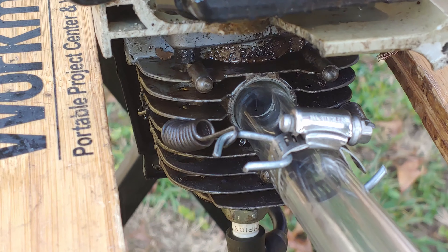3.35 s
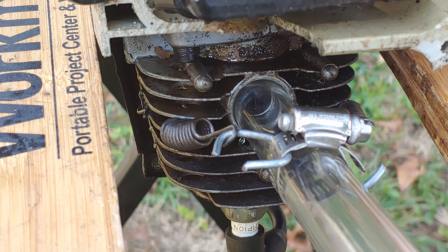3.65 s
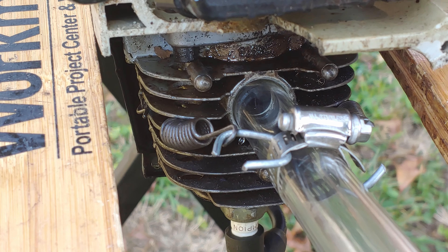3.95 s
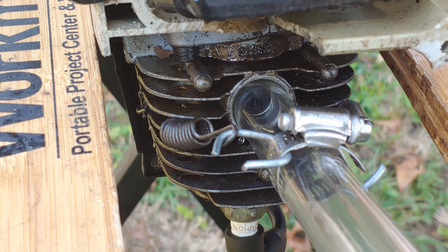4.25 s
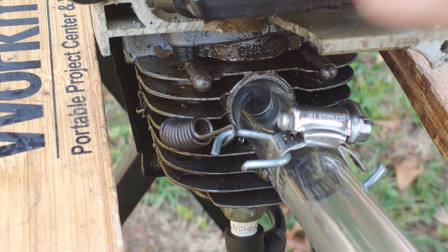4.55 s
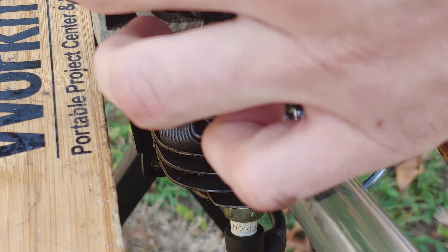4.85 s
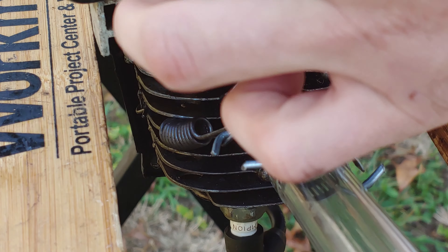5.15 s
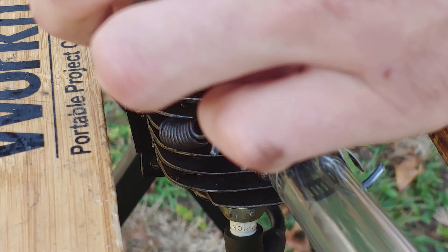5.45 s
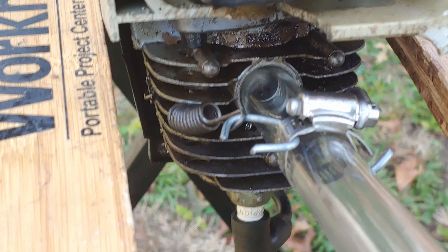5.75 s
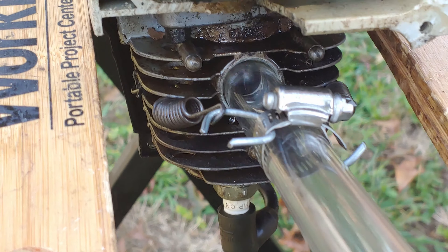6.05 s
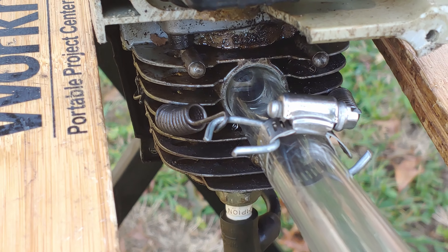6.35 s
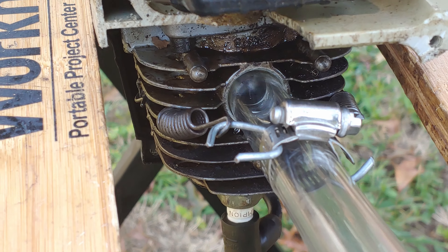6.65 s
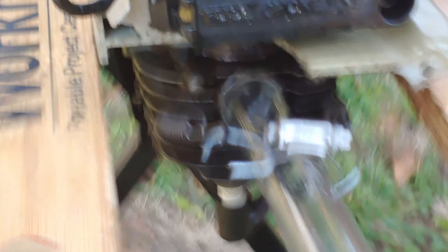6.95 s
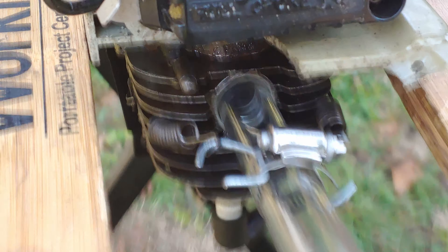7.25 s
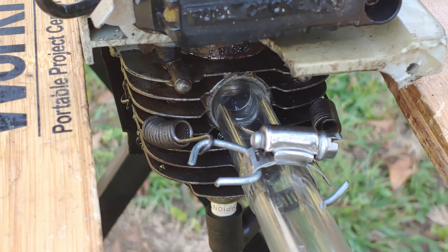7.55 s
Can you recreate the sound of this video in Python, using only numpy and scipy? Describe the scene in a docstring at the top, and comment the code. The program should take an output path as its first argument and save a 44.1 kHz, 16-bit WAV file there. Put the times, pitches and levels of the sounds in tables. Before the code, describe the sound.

A low garden hum and faint crickets run throughout. Close by, a few soft workbench thuds lead to a sharp plastic handle knock at 0.4 seconds. At 1.6 and 2.5 seconds a small two-stroke engine is pulled over. Each time the starter snaps in with a metallic clink, the cord zips taut, the engine gives a quick run of hollow puffs that slows without firing, and the cord rubs back in over a clicking ratchet. The handle knocks around 3.1 seconds. A pause follows with faint scuffs, tiny squeaks and one faint bird chip at 4.5 seconds. More knocks come around 5.3 seconds, then two further pulls at 5.7 and 6.7 seconds, each with the same puffing and ratcheting rewind. The engine never catches. From 7.3 to 7.8 seconds the bench thuds and the handle knocks against the housing.

```python
"""Over a garden hum and crickets come a few thuds and handle knocks, then a small two-stroke engine,
clamped to a workbench, is pulled over four times and never catches. On each pull the starter pawls snap
into their steel cup and the cord zips taut; every crank turn puffs out of the cylinder and rings the
closed pipe; then the cord rubs back in over the clicking ratchet. Faint scuffs and squeaks dot the
pauses, and one bird chips in the longest."""
import sys
import numpy as np
from scipy import signal
from scipy.fft import rfft, irfft
from scipy.io import wavfile
from scipy.ndimage import uniform_filter1d, minimum_filter1d, map_coordinates

SR = 44100
rng = np.random.default_rng(int(sys.argv[2]) if len(sys.argv) > 2 else 0)


def generate_wav(sig):
    """Save sig (samples, or channels by samples) to the path in sys.argv[1] as 16-bit PCM at SR."""
    pcm = np.round(np.clip(np.atleast_2d(sig).T, -1, 1) * 32767).astype(np.int16)
    wavfile.write(sys.argv[1], SR, pcm)


N = 343772
TIME = np.arange(N) / SR
AGE = TIME[:SR // 3]  # seconds since the start of a one-shot

# Tone of the garden air, cord rub, housing cracks, gas hiss and ratchet clicks.
# Each row: frequency in Hz, relative gain in dB.
AIR_EQ = [(25, -15), (42, -0.5), (110, 2.5), (150, -6.5), (220, -13.5), (450, -18.5), (800, -23),
          (1500, -27.5), (2400, -35), (4700, -32), (5400, -41), (9500, -39.5), (12000, -56), (14000, -71)]
RUB_EQ = [(200, 0), (500, -1), (1050, 1.5), (1500, 1), (1750, -6.5), (2050, -4.5), (2700, -22.5),
          (4400, -15.5), (5400, -22), (6600, -27.5), (11500, -23), (14000, -73)]
CRACK_EQ = [(300, -25), (800, 12.5), (2000, 5), (3300, 9), (5500, 2), (7000, 2.5), (11500, -7),
            (13500, -46), (16000, -26)]
GAS_EQ = [(300, 10), (1200, 0), (2300, 5.5), (2900, 1), (4400, -4.5), (5500, -15.5), (6600, 1.5),
          (8000, -34), (11500, -14.5), (13500, -19)]
CLICK_EQ = [(400, -20.5), (1100, 14.5), (2400, -1), (3500, 2), (4400, 11), (5300, -2), (6500, 2),
            (8600, -8), (11300, -4.5), (13000, -22.5), (15500, -29)]
# Resonances. Each row: nominal pitch in Hz, nominal time to fade 60 dB in seconds, relative level in dB.
BENCH_MODES = [(112, 0.15, -7.5), (188.4, 0.16, -6), (322, 0.059, -2), (441, 0.07, -1), (513, 0.036, 1)]  # bench top and frame
HOUSING_MODES = [(567, 0.11, -13.5), (816, 0.12, -12), (975, 0.039, 6.5), (1128, 0.031, 8),
                 (1301, 0.028, 12), (1509, 0.028, 10.5), (1850, 0.028, 4), (3160, 0.06, -14.5)]  # plastic starter housing and handle
CUP_MODES = [(3300, .15, -10), (3645, .09, -6), (4115, .35, 0), (4270, .1, -4), (4345, .28, 0),
             (4525, .28, -3), (4860, .28, -6), (6580, .06, -4), (7740, .14, -8), (9770, .08, -10),
             (10470, .14, -12), (10990, .12, -9), (11600, .1, -12)]  # steel starter cup and flywheel
OPEN_PORT_MODES = [(182, 0.021, -2), (265.4, 0.019, 1.5), (379, 0.021, -3.5), (597, 0.023, -3),
                   (1045, 0.035, -17), (1377, 0.064, -37)]  # cylinder and pipe with the port open
SHUT_PIPE_MODES = [(262, 0.053, 5.5), (801, 0.052, -0.5), (1290, 0.085, -11.5), (1840, 0.055, -12.5),
                   (2370, 0.15, -25), (2880, 0.087, -30)]  # a quarter-wave tube with odd overtones
# A distant motor's hum. Each row: pitch in Hz, level in dB before the swell.
HUM_PARTIALS = [(57.5, -80), (120, -49.5), (178, -59.5), (239, -65)]
# The slow swell of the garden bed. Each row: time in seconds, boost in dB.
GARDEN_SWELL = [(0, 8), (.6, 1.5), (1.3, 4), (3.3, 0), (3.7, 4), (4.5, 4.5), (5.1, 4.5), (6.5, 1), (7.8, 7)]
# Bench thuds. Each row: start in seconds, level in dB.
THUDS = [(.005, -28), (0.254, -22.5), (0.279, -26), (.341, -21.5), (1.522, -26.5), (2.966, -24),
         (5.492, -22.5), (6.152, -24), (6.204, -25), (7.297, -8.5), (7.433, -15), (7.644, -27.5),
         (7.741, -18)]
# Faint scuffs and rustles. Each row: start in seconds, length in seconds, level in dB.
SCUFFS = [(0.058, 0.063, -48), (1.187, 0.083, -53.5), (3.33, 0.022, -46.5), (3.482, 0.054, -51.5),
          (3.604, 0.058, -45), (3.87, 0.28, -57), (4.654, 0.058, -51.5), (5.478, 0.063, -39.5)]
# Far squeaks. Each row: start in seconds, length in seconds, centre pitch in Hz, level in dB.
SQUEAKS = [(0.063, 0.064, 1624, -47), (4.663, .05, 1680, -59), (4.858, 0.029, 1647, -51.5)]
# The handle hits the housing. Each row: start in seconds, body in dB, crack in dB,
# tilt of the body in dB per octave.
HANDLE_KNOCKS = [(.248, -26, -32.5, -8), (.280, -37, -38, -6), (.3665, -2.5, -2.5, -2),
                 (.982, -34, -46, -32), (2.256, -13.5, -45, 4), (3.085, -9.5, -18, 5),
                 (3.15, -10.5, -18, 11), (3.1851, -7.5, -50, 3), (3.636, -38, -42, -4),
                 (3.736, -36.5, -41, -19), (3.846, -50, -39, 0), (5.194, -17, -35, -6),
                 (5.324, -15, -18.5, -8), (5.337, -15, -9, -8), (5.492, -24, -37, 16.5),
                 (5.686, -28.5, -44, 2), (7.4026, -5, -23, 3), (7.536, -22.5, -42, 6.5),
                 (7.587, -27, -58, -1), (7.619, -22.5, -55, -21.5), (7.661, -28, -19.5, 0)]
# The four pulls. Each row: pawl catch in seconds, its level in dB, its tilt in dB per octave,
# cup ring in dB, cord rub in dB, puffs in dB, first puff against the rest in dB.
PULLS = [(1.586, -11, 1, -23, -27, 0.5, -1), (2.457, 0, -5.5, -4.5, -22, -1, -6.5),
         (5.724, 0, -9, 1, -24, 0, -10.5), (6.662, 0.5, 3, -9, -23, -1.5, 0.5)]
# The cord snaps taut against the first full compression.
# Each row: time in seconds, zip in dB, jolt of the housing in dB.
TUGS = [(1.645, -17, -3), (2.491, -17, -1), (5.785, -20, -8), (6.716, -11, -14)]
# Crank speed, one curve a pull: it dips on compression, rises with the arm and coasts down.
# Each row of a curve: time in seconds, speed in turns per second.
CRANK_SPEEDS = [
    [(1.6499, 15.54), (1.6976, 29.8), (1.7846, 37.35), (1.9008, 13.41), (1.9992, 10.5)],
    [(2.4866, 46.72), (2.5121, 34.35), (2.6076, 47.14), (2.7717, 14.59), (2.8606, 11.38)],
    [(5.7528, 31.38), (5.7874, 28.04), (5.9053, 42.63), (6.0229, 20.07), (6.1109, 7.81)],
    [(6.7161, 24.4), (6.7521, 36.78), (6.8352, 48.86), (6.9807, 19.2), (7.0872, 9.08)],
]
# Near full speed a pawl skips on the cup. Each row: start in seconds, level in dB.
PAWL_SKIPS = [(1.738, -20.5), (1.823, -20.5), (2.622, -12.5), (5.887, -15.5), (6.84, -9)]
# Pulley speed as the hand lets the cord back in, one curve a pull.
# Each row of a curve: time in seconds, speed in ratchet teeth per second.
REWIND_SPEEDS = [
    [(1.917, 80), (2.0122, 58.59), (2.1033, 54.6), (2.1963, 76), (2.232, 13.73)],
    [(2.8208, 76), (2.8477, 40.5), (2.975, 61.5), (3.0696, 47.4), (3.1584, 7.46)],
    [(6.0942, 16.5), (6.1555, 53), (6.2265, 108.6), (6.2282, 81.49), (6.362, 54.4)],
    [(7.051, 74), (7.1242, 42.7), (7.186, 102.4), (7.2059, 48.8), (7.3855, 27.2)],
]

WEAK_SPEED, RINGING_SPEED = 20, 27.6  # turns per second: puffs weaken below; the pipe rings best
USUAL_REWIND = 60  # teeth per second at which the rewind has its nominal level


def undb(db):
    """Decibels to gain."""
    return 10 ** (np.asarray(db) / 20)


def unit(x):
    """Scale to rms 1."""
    return x / np.sqrt(np.mean(x ** 2))


def add(out, s, sound):
    """Mix a sound into out from time s on."""
    i = max(int(s * SR), 0)
    out[..., i:i + sound.shape[-1]] += sound[..., :N - i]


def eq(x, points, size=4096):
    """Minimum-phase filter through (Hz, dB) points, scaled to unit power gain."""
    hz, db = np.transpose(points)
    grid = np.maximum(np.arange(size // 2 + 1) * SR / size, 1)
    gain = undb(np.interp(np.log(grid), np.log(hz), db))
    cepstrum = irfft(np.log(gain))
    cepstrum[1:size // 2] *= 2
    cepstrum[size // 2 + 1:] = 0
    response = irfft(np.exp(rfft(cepstrum)))
    return signal.oaconvolve(x, response[None] / np.linalg.norm(response))[:, :x.shape[1]]


def ring(hz, t60, db, phase=0):
    """One struck mode."""
    return undb(db) * np.sin(2 * np.pi * hz * AGE + phase) * np.exp(-np.log(1000) * AGE / t60)


def stereo_noise(size, shared):
    """White noise with the given share of its power common to left and right."""
    noise = rng.standard_normal((3, size))
    return np.sqrt(shared) * noise[2] + np.sqrt(1 - shared) * noise[:2]


def drift(rate):
    """Random wandering near a spread of 1: rate knots a second, holding after the last."""
    knots = rng.standard_normal(2048)
    return np.interp(TIME * rate, np.arange(len(knots)), knots)


def pan(db):
    """Left and right gains for a left minus right level."""
    return undb(np.array([[db], [-db]]) / 2)


def soften(sound, push_s):
    """A push spread over time excites only the lower modes."""
    push = AGE[:SR // 40] * np.exp(-AGE[:SR // 40] / push_s)
    return signal.fftconvolve(sound, push / push.sum())[:len(sound)]


def burst(decay_s, shared):
    """A spray of stereo noise that dies away."""
    return stereo_noise(len(AGE), shared) * np.exp(-AGE / decay_s)


def cycle_starts(speeds):
    """One (start, rate) row for each cycle of something that turns along a speed curve."""
    s, rate = np.transpose(speeds)
    t = np.arange(s[0], s[-1], 1 / SR)
    rate = np.interp(t, s, rate)
    cycles = np.cumsum(rate) / SR
    at = np.searchsorted(cycles, np.arange(int(cycles[-1]) + 1))
    return np.column_stack([t[at], rate[at]])


def held(start_s, end_s, attack_s=0.032, release_s=0.056):
    """Envelope that rises from start_s, holds until end_s and dies away."""
    attack = np.clip((TIME - start_s) / attack_s, 0, 1)
    return attack * np.exp(-np.maximum(TIME - end_s, 0) / release_s)


def garden(air_db=-47):
    """The bed: low outdoor rumble, alike on both sides, thin diffuse hiss and a wavering motor hum."""
    low = signal.butter(1, 900, fs=SR, output="sos")
    centre, sides = rng.standard_normal(N), rng.standard_normal((2, N))
    air = signal.sosfilt(low, centre) + sides - signal.sosfilt(low, sides)
    air = unit(eq(air, AIR_EQ)) * undb(air_db + drift(25))
    hum = np.zeros(N)
    for hz, db in HUM_PARTIALS:
        level = np.sqrt(2) * undb(db + 2 * drift(1.1))
        hum += level * np.sin(2 * np.pi * hz * TIME + 0.77 * drift(1.924))
    swell = undb(np.interp(TIME, *np.transpose(GARDEN_SWELL)))
    return pan(2.8) * (air + hum) * swell


def crickets(chorus_db=-56, chirp_db=-62, chirp_hz=7520, chirps_per_s=13):
    """A far chorus blurs into one band; a nearer insect pulses just above it."""
    band = [(5000, -46), (6000, -29.5), (6300, -11.5), (6600, -7.5),
            (7000, -20), (7800, -23), (9000, -42), (12000, -95)]
    chorus = eq(stereo_noise(N, 0.033), band) * undb(chorus_db + 0.5 * drift(40))
    stroke = np.maximum(np.sin(2 * np.pi * chirps_per_s * TIME + drift(3.3) / 2), 0) ** 2
    tone = np.sin(2 * np.pi * chirp_hz * TIME + drift(200) / 2)
    return chorus + undb(chirp_db + 2 * drift(2)) * stroke * tone


def bench(trim_db=-5, push_s=0.000086):
    """The engine rocks the bench; neighbouring modes swing against each other, so thuds swell softly."""
    out = np.zeros(N)
    for s, db in THUDS:
        thud = sum((-1) ** k * ring(hz * rng.uniform(0.83, 1.003), t60, mode_db)
                   for k, (hz, t60, mode_db) in enumerate(BENCH_MODES))
        add(out, s, undb(db + trim_db) * soften(thud, push_s))
    return pan(15) * out


def scuffs(grain_db=6):
    """Soft swells of dry little grains."""
    out = np.zeros((2, N))
    for s, length_s, db in SCUFFS:
        grains = unit(stereo_noise(len(AGE), 0.21) * undb(grain_db * rng.standard_normal(len(AGE))))
        swell = np.sin(np.pi * np.minimum(AGE / length_s, 1))
        add(out, s, undb(db) * grains * swell)
    return eq(out, [(200, -9), (500, 0.5), (1000, 0), (1600, -1), (2200, -15),
                    (4500, -21), (6000, -25), (10000, -39), (13000, -38)])


def squeaks(sag=.06, rasp_rad=0.66):
    """Short, slightly hoarse tones that sag in pitch."""
    out = np.zeros((2, N))
    for s, length_s, hz, db in SQUEAKS:
        progress = np.minimum(AGE / length_s, 1)
        pitch = hz * (1 + sag * (.5 - progress))
        phase = 2 * np.pi * np.cumsum(pitch) / SR + rasp_rad * drift(300)[:len(AGE)]
        add(out, s, undb(db) * np.sin(np.pi * progress) * np.sin(phase))
    return out


def housing_knocks(chatter_s=0.0034, crack_s=0.0037, rise_s=0.00018):
    """Handle, pawls and cord jolt the plastic housing: chattering blows ring it and hard ones crack."""
    # same columns as HANDLE_KNOCKS
    catches = [(s, db, db - 9, tilt_db) for s, db, tilt_db, *_ in PULLS]
    jolts = [(s - .005, db, db - 14, -5) for s, _, db in TUGS]
    skips = [(s, db - 9, db - 4, 0) for s, db in PAWL_SKIPS]
    body, cracks = np.zeros((2, N)), np.zeros((2, N))
    contact = 1 - np.exp(-AGE / rise_s)
    for s, body_db, crack_db, tilt_db in HANDLE_KNOCKS + catches + jolts + skips:
        plastic = np.zeros(len(AGE))
        for hz, t60, db in HOUSING_MODES:  # every contact point favours other modes
            tilted_db = db + tilt_db * np.log2(hz / HOUSING_MODES[0][0])
            plastic += ring(hz * rng.uniform(0.93, 1.04), t60, tilted_db + 2 * rng.standard_normal())
        knock = signal.fftconvolve(contact * burst(chatter_s, 0.65), plastic[None])[:, :len(AGE)]
        add(body, s, undb(body_db) * knock / np.abs(knock).max())
        add(cracks, s, undb(crack_db) * contact * burst(crack_s, 0.1))
    return undb(1) * body + undb(-3) * pan(2) * eq(cracks, CRACK_EQ)


def cord_rub(rewind_db=-31.5, slack_db=-47, slack_s=0.038, grain_db=4, flutter_db=4.5):
    """Cord fibres and pulley catch and slip in dense uneven grains, louder the faster the cord runs."""
    level = np.zeros(N)
    for crank, rewind, (catch_s, _, _, _, rub_db, *_) in zip(CRANK_SPEEDS, REWIND_SPEEDS, PULLS):
        out_speed = np.interp(TIME, *np.transpose(crank)) / RINGING_SPEED
        back_speed = np.interp(TIME, *np.transpose(rewind)) / USUAL_REWIND
        rewind_s, home_s = rewind[0][0], rewind[-1][0]
        slack = undb(slack_db) * held(catch_s - slack_s, catch_s)  # slides out before the pawls catch
        going = undb(rub_db) * out_speed ** 0.53 * held(catch_s, rewind_s)
        coming = undb(rewind_db) * back_speed ** 0.67 * held(rewind_s, home_s)
        level += slack + np.hypot(going, coming)
    grains = stereo_noise(N, 0.43) * undb(grain_db * rng.standard_normal(N) + flutter_db * drift(170))
    return eq(unit(grains) * level, RUB_EQ)


def steel_cup(blows, t60_scale=0.66, tilt_db=-1, jingle_db=5, ping_db=5, ping_s=0.042):
    """Each (s, dB) blow favours other modes of the cup; each mode has its own phase left and right."""
    side_phase = np.array([[1], [-1]])
    modes = []
    for k, (hz, t60, db) in enumerate(CUP_MODES):
        tilted_db = db + tilt_db * np.log2(hz / CUP_MODES[0][0])
        modes.append(ring(hz, t60 * t60_scale, tilted_db, side_phase * (-1) ** k))
    # the pawl falls back on the steel and damps the first bright ping
    modes = np.array(modes) * (1 + undb(ping_db) * np.exp(-AGE / ping_s))
    out = np.zeros((2, N))
    for s, db in blows:
        gains = undb(db + jingle_db * rng.standard_normal(len(modes)))
        add(out, s, np.tensordot(gains, modes, 1) / len(modes))
    # the cup wobbles as it spins, which blurs its tones
    wobbled = np.arange(N) + 1.6 * drift(70)
    return np.array([map_coordinates(side, [wobbled]) for side in out])


def pawl_clinks(trim_db=-2):
    """The pawls ring the steel cup as they catch or skip."""
    catches = [(s, cup_db) for s, _, _, cup_db, *_ in PULLS]
    return undb(trim_db) * steel_cup(catches + PAWL_SKIPS)


def cord_zips(low_hz=750, high_hz=1750, length_s=0.029, rasp_rad=0.94):
    """The braid of the cord buzzes over the eyelet, faster and louder until the piston gives way."""
    out = np.zeros((2, N))
    rise = np.minimum(AGE / length_s, 2)
    swell = np.where(rise < 1, rise ** 2, np.exp(-20 * (rise - 1)))
    pitch = low_hz * (high_hz / low_hz) ** np.minimum(rise, 1)
    for s, db, _ in TUGS:
        phase = 2 * np.pi * np.cumsum(pitch) / SR + rasp_rad * drift(753)[:len(AGE)]
        grit = 1 + 0.1 * stereo_noise(len(AGE), 0.34)
        add(out, s - length_s, undb(db) * swell * np.sin(phase) * grit)
    return out


def crank_turns(ring_db=-8.5, off_speed_db=21):
    """Yield (start, period, puff dB, pipe dB): slow turns puff weakly, slow and fast ones ring less."""
    for speeds, (*_, pull_db, first_db) in zip(CRANK_SPEEDS, PULLS):
        for k, (s, speed) in enumerate(cycle_starts(speeds)):
            db = pull_db + (first_db if k == 0 else 0)
            puff_db = db - 10 * np.log10(1 + (WEAK_SPEED / speed) ** 2)
            pipe_db = db + ring_db - off_speed_db * np.log2(speed / RINGING_SPEED) ** 2
            yield s, 1 / speed, puff_db, pipe_db


def engine(puff_boost_db=10, gas_db=-23, usual_turn_s=0.029, slow_turn_s=0.032, outlet_hz=105):
    """Each turn puffs as the port opens, then rings the pipe as it shuts; slow turns sound dull."""
    air, gas = np.zeros(N), np.zeros((2, N))
    for open_s, period, puff_db, pipe_db in crank_turns():
        shut_s = open_s + .41 * period
        dullness = (period / slow_turn_s) ** 4
        scatter = rng.standard_normal((4, 6))
        # a faster piston throws the port open sooner: the puff is shorter and higher
        snap = (usual_turn_s / period) ** .17
        puff = sum(ring(hz * (snap + .012 * detune), t60 / snap, db + 2.5 * accent)
                   for (hz, t60, db), detune, accent in zip(OPEN_PORT_MODES, *scatter[:2]))
        puff = soften(puff, push_s=.00005 * (1 + dullness))
        # with no firing the cylinder is below air pressure, so each puff starts as a suck
        add(air, open_s, -undb(puff_db + puff_boost_db) * puff / np.abs(puff).max())
        pipe = sum(ring(hz * (1 + 0.0033 * detune), t60, db + 1.15 * accent)
                   for (hz, t60, db), detune, accent in zip(SHUT_PIPE_MODES, *scatter[2:]))
        add(air, shut_s, -undb(pipe_db) * soften(pipe, push_s=.00003 * dullness))
        for edge_s in (open_s, shut_s):  # gas hisses through the port at both edges
            add(gas, edge_s, undb(puff_db) * burst(decay_s=0.0084, shared=0.074))
    # the small outlet radiates deep tones poorly
    air = signal.sosfilt(signal.butter(4, outlet_hz, "high", fs=SR, output="sos"), air)
    return air + undb(gas_db) * eq(gas, GAS_EQ)


def ratchet(click_db=-19, ring_db=-16.5, decay_s=0.0045, bounce_s=0.0043, bite_s=0.063, ease_s=.045):
    """A pawl drops off each tooth, bounces once and rings the cup, harder at speed."""
    teeth = []
    for speeds in REWIND_SPEEDS:
        for s, rate in cycle_starts(speeds):
            # the pawl bites gradually and eases off at the end
            loose = max(1 - (s - speeds[0][0]) / bite_s, 1 - (speeds[-1][0] - s) / ease_s, 0)
            db = 3 * np.log2(rate / USUAL_REWIND) - 6 * loose + 1.7 * rng.standard_normal()
            teeth.append((s, db))
    clicks = np.zeros((2, N))
    for s, db in teeth:
        add(clicks, s, undb(db) * burst(decay_s, 0.091))
        add(clicks, s + rng.uniform(.5, 1.5) * bounce_s, undb(db - 5) * burst(decay_s, 0.32))
    return undb(click_db) * pan(2) * eq(clicks, CLICK_EQ) + undb(ring_db) * pan(-2) * steel_cup(teeth)


def bird(start_s=4.521, low_hz=5600, high_hz=7600, length_s=.026, chip_db=-46, echo_db=2):
    """One faint rising chip, smeared by the trees."""
    progress = np.minimum(AGE / length_s, 1)
    pitch = low_hz + (high_hz - low_hz) * progress
    chip = np.sin(2 * np.pi * np.cumsum(pitch) / SR) * np.abs(np.sin(np.pi * progress)) ** .5
    trees = burst(decay_s=.055, shared=0)
    echo = signal.fftconvolve(trees / np.linalg.norm(trees[0]), chip[None])[:, :len(AGE)]
    out = np.zeros((2, N))
    add(out, start_s, undb(chip_db) * (chip + undb(echo_db) * echo))
    return out


def yard(dry, echo_db=-23, build_s=0.0098, decay_s=0.045):
    """Adds weak scattered reflections from ground, walls and trees."""
    tail = burst(decay_s, 0.087) * (1 - np.exp(-AGE / build_s))
    tail = eq(tail, [(80, -19.5), (400, -3.5), (1200, -7), (4000, -2), (8000, -11), (14000, -10)])
    echo = signal.oaconvolve(dry, tail / np.linalg.norm(tail[0]), axes=1)[:, :N]
    return dry + undb(echo_db) * echo


def scene():
    """The starter and engine up front, the garden behind."""
    pulls = engine() + cord_rub() + cord_zips() + ratchet() + housing_knocks() + pawl_clinks()
    return yard(pulls + bench() + scuffs() + squeaks()) + garden() + crickets() + bird()


def record(dry, ceiling=.97, window_samples=48, top_hz=16000):
    """A fast limiter holds the loudest peaks near full scale; the top is cut."""
    needed_gain = ceiling / np.maximum(np.abs(dry).max(axis=0), ceiling)
    gain = uniform_filter1d(minimum_filter1d(needed_gain, window_samples), window_samples)
    return signal.sosfilt(signal.ellip(8, .2, 70, top_hz, fs=SR, output="sos"), gain * dry)


dry = scene()
out = record(dry)
generate_wav(out)
```